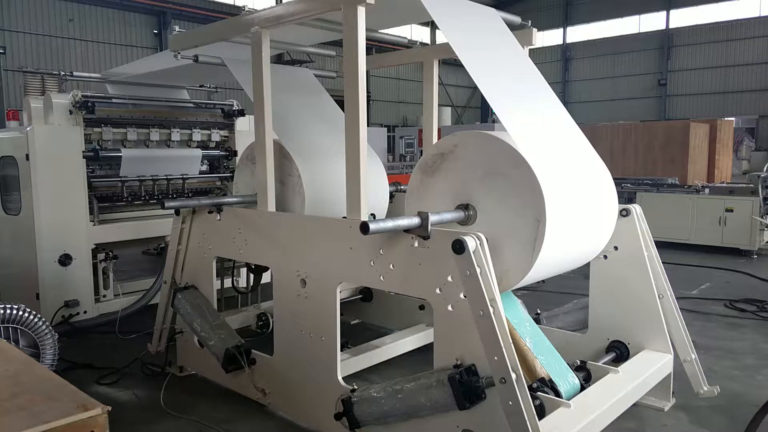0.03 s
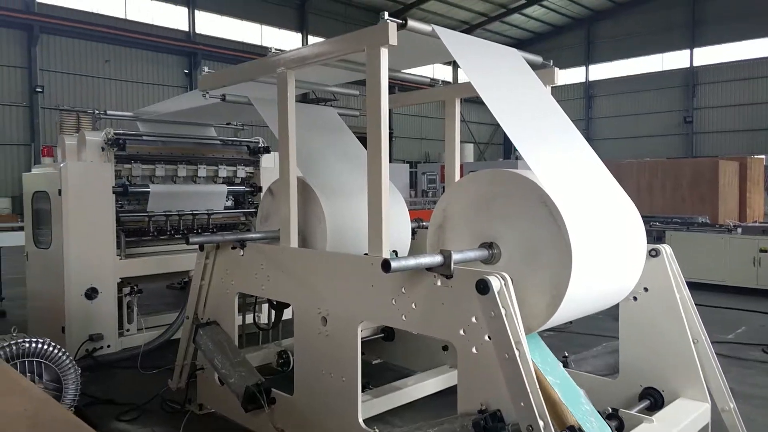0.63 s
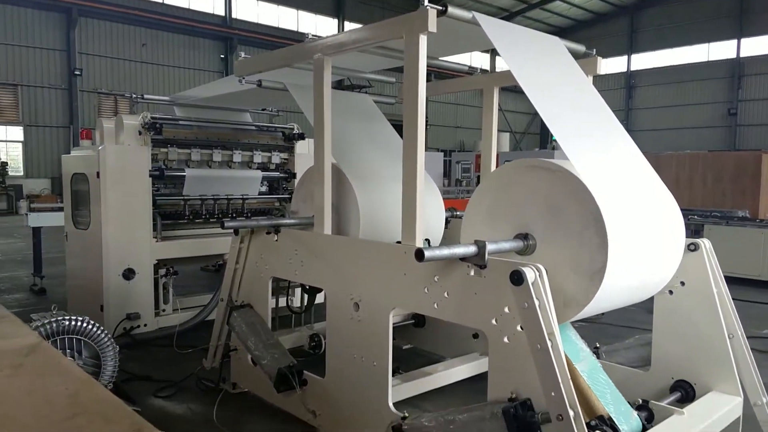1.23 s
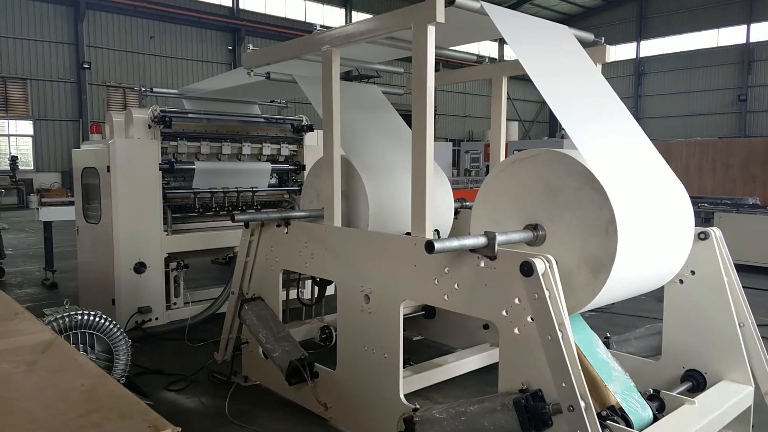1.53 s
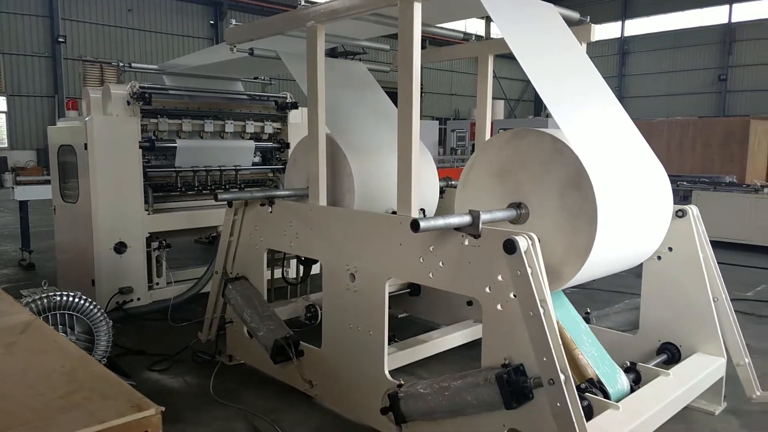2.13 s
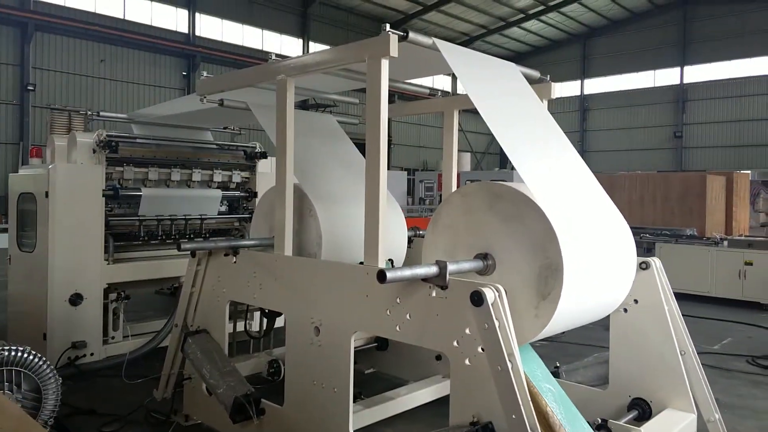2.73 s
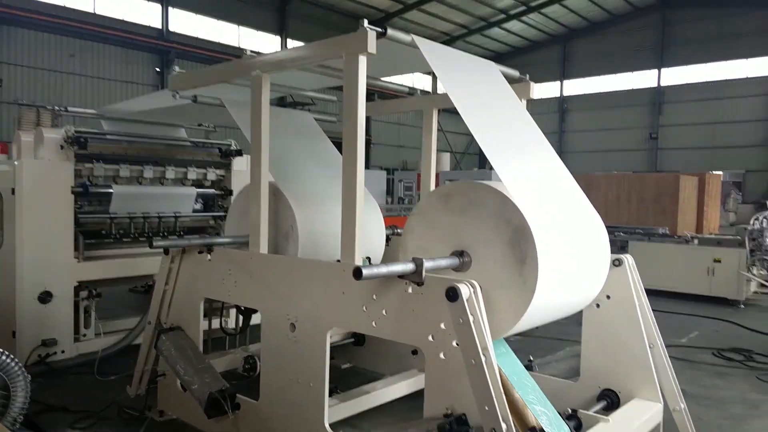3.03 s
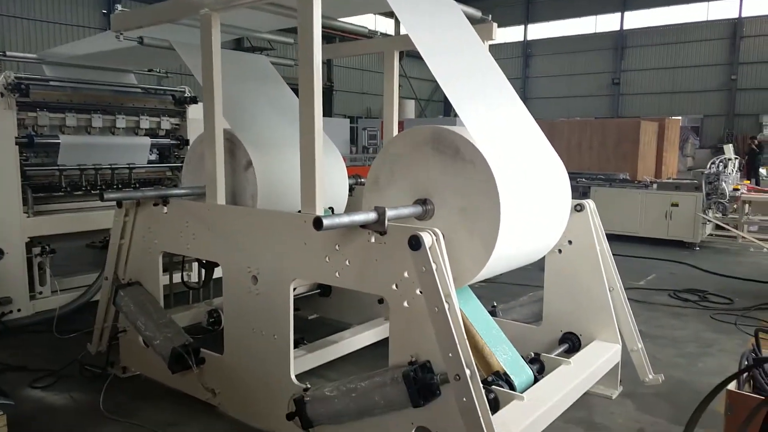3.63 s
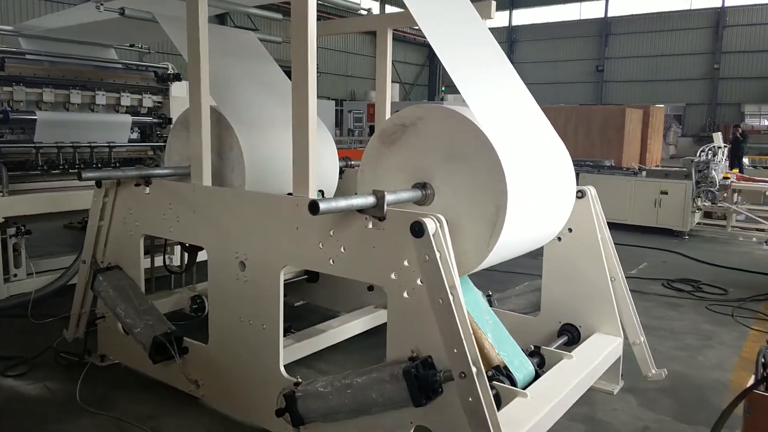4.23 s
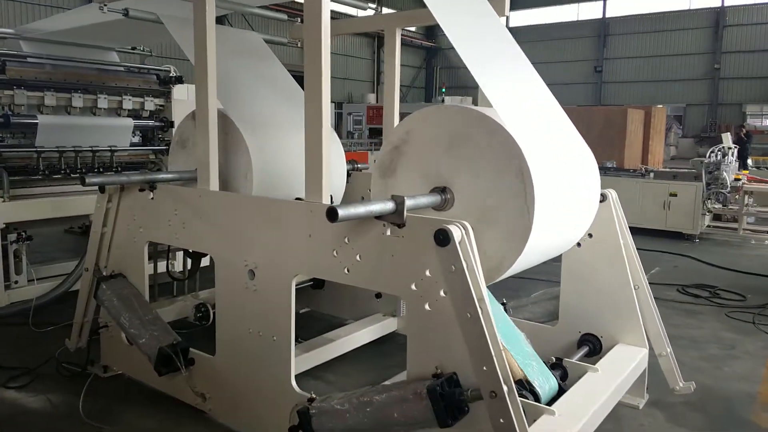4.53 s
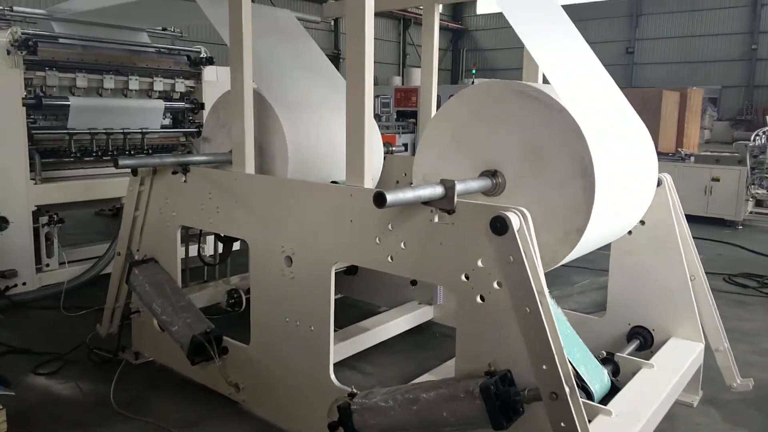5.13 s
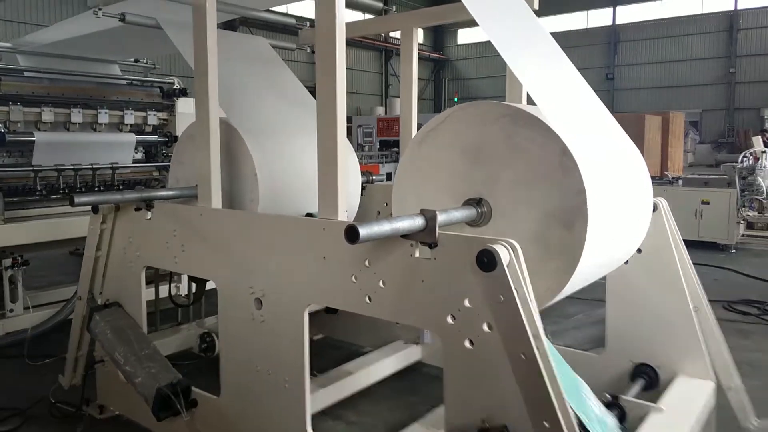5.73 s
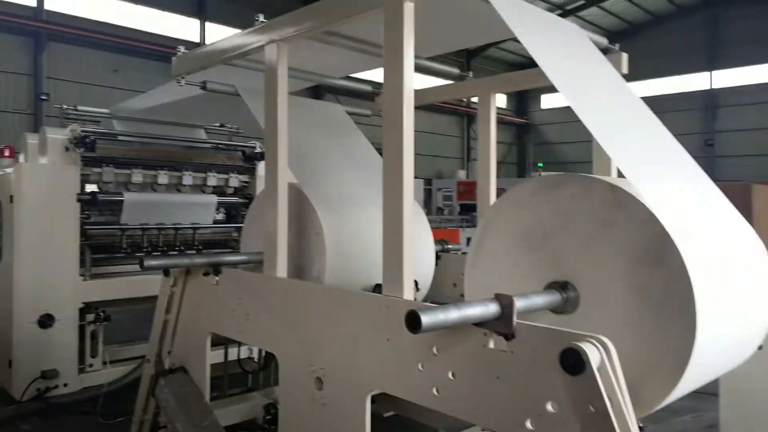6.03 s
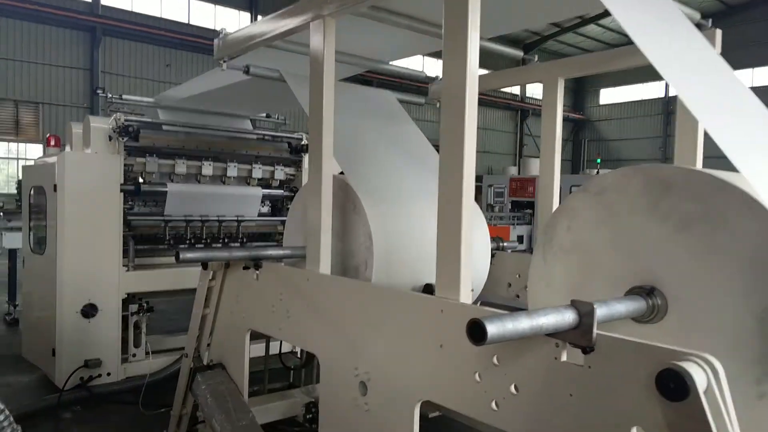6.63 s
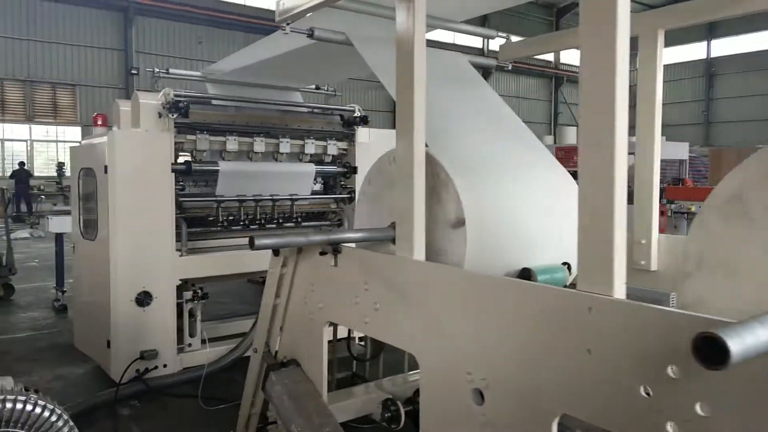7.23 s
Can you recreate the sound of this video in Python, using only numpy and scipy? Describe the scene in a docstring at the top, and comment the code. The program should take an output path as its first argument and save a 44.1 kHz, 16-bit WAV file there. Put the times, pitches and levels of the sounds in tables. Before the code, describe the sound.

A paper converting machine runs loudly in a factory hall, with low thrumming, rushing paper, hissing air and a high wavering whistle.

```python
"""Tissue machine in a factory hall

A hand-held microphone walks past the unwinding reels of a tissue converting machine. Folding rolls
thrum in the steel frame, the paper web rushes, suction air hisses and whistles with each stroke, and
a blower, a gearbox and a motor drive whine. The sound fades in after a short silence; a few light
knocks come later, and twice a finger briefly shades the left microphone port."""
import sys
import numpy as np
from scipy import signal
from scipy.io import wavfile
from scipy.ndimage import uniform_filter1d

SR = 44100
rng = np.random.default_rng(int(sys.argv[2]) if len(sys.argv) > 2 else 0)


def bounce(signal):
    """Save signal as a 16-bit WAV file at the path given by the first command-line argument."""
    frames = np.transpose(np.atleast_2d(signal))
    limited = np.clip(frames, -1, 1)
    pcm = np.round(limited * 32767).astype(np.int16)
    wavfile.write(sys.argv[1], SR, pcm)


N = 325458
T = np.arange(N) / SR


def gain_of(db):
    """Decibels to amplitude."""
    return 10 ** (np.asarray(db) / 20)


def unit_rms(x):
    """Scales to rms 1."""
    return x / np.sqrt(np.mean(abs(x) ** 2) + 1e-20)


def curve(rows, t=T):
    """The columns of a time table, joined by straight lines."""
    times, *columns = np.transpose(rows)
    return np.array([np.interp(t, times, column) for column in columns])


def spectrum_at(points, hz):
    """Reads a spectrum table on a log-frequency axis."""
    freqs, values = np.transpose(points)
    return np.interp(np.log(hz + 1), np.log(freqs + 1), values)


def phase_of(hz):
    """Running phase of a frequency or frequency curve."""
    return 2 * np.pi * np.cumsum(hz * np.ones(N)) / SR


def swell(centre_s, width_s):
    """A smooth rise to 1 and fall around one moment."""
    return np.exp(-((T - centre_s) / width_s) ** 2)


def drift(width_hz):
    """Slow complex random wander, one row per port."""
    step = 32
    hz = np.fft.fftfreq(N // step + 2, step / SR)
    real, imag = rng.standard_normal((2, 2, len(hz)))
    slow = np.fft.ifft((real + 1j * imag) * np.exp(-2 * (hz / width_hz) ** 2))
    return unit_rms(np.array([np.interp(np.arange(N) / step, np.arange(len(hz)), row) for row in slow]))


# The walk up to the steel side frame: time_s, nearness (0-1)
FRAME_NEARNESS = [(3.4, 0), (4.0, 0.27), (4.6, 0.8), (6.5, 0.8)]

def walk_gain(db, left_db, near_db=0, reel_db=0, facing_db=0, near_left_db=0):
    """Level and leftward lean as the walk nears the frame, passes a reel and faces the folding unit."""
    near = curve(FRAME_NEARNESS)[0]
    passing_reel = swell(centre_s=5.43, width_s=0.46)
    facing = np.clip((T - 6.12) / 0.67 + .5, 0, 1)
    level_db = db + near_db * near + reel_db * passing_reel + facing_db * facing
    lean_db = left_db + near_left_db * near
    return gain_of(level_db + np.array([[.5], [-.5]]) * lean_db)


# Ring of the frame, guards and rolls: centre_hz, width_hz, far_lift_db, near_lift_db
BODY_RESONANCES = [(82.6, 16, 9, -2.5), (108, 10, -4, 9.5), (153, 11, 0.5, 3), (173.7, 19, 4, -3),
                   (240.6, 33, 4, 1.5), (290.5, 21.5, 5.5, -1), (312, 21, -3, 5), (356, 25, 2.5, 5),
                   (443.7, 31, 9, 0), (506, 15, 2.5, -8), (568, 17, 3.5, -2.5), (788, 54, 0.5, 4.5),
                   (1050, 34, 7, 3), (1220, 35, 4, 5), (2283, 54, 3, 5.5), (2800, 76, 2, 7),
                   (2874, 54, 5.5, 5.5), (3100, 28, 4.5, -4), (4530, 115, 7, 2)]
# Likeness of the two ports, centred bass to wide treble: freq_hz, coherence (0-1)
PORT_COHERENCE = [(60, 1), (200, 0.93), (330, 0.92), (640, 0.54), (1400, 0.036), (3100, 0.027),
                  (7000, 0.0085)]

def machine_noise(colour, patchy_db, size, modes_db=0, tilt=None):
    """Patchy stereo noise at rms 1, coloured by its source, the machine's body and the hall's modes."""
    hop = size // 4
    t, hz = np.arange(N // hop + 3) * hop / SR, np.fft.rfftfreq(size, 1 / SR)
    left_re, left_im, apart_re, apart_im, patches, modes = rng.standard_normal((6, len(t), len(hz)))
    patches = unit_rms(uniform_filter1d(uniform_filter1d(patches, 3, axis=0), 16, axis=1))
    # standing waves: narrow peaks and dips that last about a second
    modes = unit_rms(uniform_filter1d(uniform_filter1d(modes, SR // hop, axis=0), 2, axis=1))
    db = spectrum_at(colour, hz) + patchy_db * patches + modes_db * modes
    if tilt is not None:
        octaves = np.log2((hz + 1) / 125)
        db += curve(tilt, t).T * octaves * np.exp(-octaves ** 2 / 2)
    centre_hz, width_hz, far_db, near_db = np.transpose(BODY_RESONANCES)
    lift_db = far_db + curve(FRAME_NEARNESS, t).T * (near_db - far_db)
    db += lift_db @ np.exp(-2 * ((hz - centre_hz[:, None]) / width_hz[:, None]) ** 2)
    coherence = np.clip(spectrum_at(PORT_COHERENCE, hz), -1, 1)
    left = left_re + 1j * left_im
    right = coherence * left + np.sqrt(1 - coherence ** 2) * (apart_re + 1j * apart_im)
    spectra = (np.array([left, right]) * gain_of(db)).transpose(0, 2, 1)
    return unit_rms(signal.istft(spectra, nperseg=size, noverlap=size - hop)[1][:, :N])


def standing_waves(diffuse, flicker_hz, turn_rad, lead_rad):
    """Gain and phase of a tone at each port: a slowly turning direct wave plus flickering hall echoes."""
    direct_phase = turn_rad * drift(width_hz=1.95).real + lead_rad * np.array([[1], [0]])
    return unit_rms(np.exp(1j * direct_phase) + diffuse * drift(flicker_hz))


# Deep thrum of the frame: freq_hz, relative_db
THRUM_EQ = [(15, -43), (40, -53), (60, -24), (85, -8.5), (115, -2), (170, 2), (205, -17.5), (320, -48)]
# The thrum deepens in front of the folding unit; slope at 125 Hz: time_s, tilt_db_per_octave
THRUM_SLOPE = [(2.2, 1), (3.3, -1.5), (5.0, 5), (6.1, 2.5), (7.1, -10.5)]
# The rolls labour now and then: centre_s, extra_thrum_db
THRUM_SURGES = [(2.2, 2), (4.68, 3), (6.02, 5), (7.1, 3.5)]
# Low-mid rumble of the rolls: freq_hz, relative_db
RUMBLE_EQ = [(60, -50), (145, -19), (195, -9), (240, -2), (340, 0), (420, -6), (600, -7.5), (800, -13),
             (1150, -18), (1500, -30), (3000, -44)]

def folding_rolls(stroke):
    """The folding rolls shake the frame, a little harder once a stroke; one panel hums."""
    surge_db = sum(db * swell(s, width_s=0.089) for s, db in THRUM_SURGES)
    thrum = machine_noise(THRUM_EQ, patchy_db=0.9, size=4096, modes_db=2.2, tilt=THRUM_SLOPE)
    thrum *= walk_gain(db=-31.5, left_db=2.5, near_db=4)
    thrum *= gain_of(surge_db + 0.67 * np.cos(stroke + 0.69))
    rumble = machine_noise(RUMBLE_EQ, patchy_db=1.24, size=4096, modes_db=2)
    rumble *= walk_gain(db=-22.5, left_db=2, near_db=1.5, facing_db=-1.3, near_left_db=-1)
    rumble *= gain_of(.3 * np.cos(stroke + 0.87))
    hum = unit_rms((drift(width_hz=29)[0] * np.exp(1j * phase_of(hz=874))).real)
    return thrum + rumble + hum * walk_gain(db=-45.5, left_db=7.5, near_db=2, reel_db=7)


# Papery rush of the web: freq_hz, relative_db
WEB_EQ = [(800, -13), (1400, -5), (2000, -3.5), (2400, 0.5), (3300, 0.5), (4000, -2), (4700, -3.5),
          (5400, -20), (8000, -37)]
# Bright suction hiss: freq_hz, relative_db
AIR_EQ = [(3500, -25), (4900, -2), (6200, -1.5), (7800, -1), (9000, 3.5), (12000, -32)]
# Fine sizzle on top: freq_hz, relative_db
SIZZLE_EQ = [(6000, -28), (8000, -12.5), (8800, -2.5), (9600, 1), (10700, -3.5), (12000, -8), (14000, -12),
             (15500, -19.5)]
# Brief swells of all three: centre_s, extra_db
RUSH_SWELLS = [(5.1, 1), (6.0, 2), (7.26, 3)]

def paper_and_air():
    """The web slides over its rollers; air escapes from the suction holes; both waver a little."""
    web = machine_noise(WEB_EQ, patchy_db=1.6, size=1024)
    web *= walk_gain(db=-30.5, left_db=.3, near_db=-0.5, reel_db=2.5, facing_db=0.4, near_left_db=-0.6)
    air = machine_noise(AIR_EQ, patchy_db=1.64, size=512)
    air *= walk_gain(db=-34, left_db=1.2, near_db=1.1, reel_db=0.8, facing_db=-1.5, near_left_db=4.5)
    sizzle = machine_noise(SIZZLE_EQ, patchy_db=1.5, size=512)
    sizzle *= walk_gain(db=-34.5, left_db=8, near_db=1.5, reel_db=-1.5, facing_db=0.7, near_left_db=-3)
    rush_db = sum(db * swell(s, width_s=0.078) for s, db in RUSH_SWELLS)
    return (web + air + sizzle) * gain_of(rush_db + .45 * drift(width_hz=14).real[0])


# Fader ride as the microphone crosses the whistle's standing waves: time_s, left_db, right_db
WHISTLE_RIDE = [(1.0, -33, -30.5), (1.7, -33.5, -31.5), (2.3, -36.5, -31.0), (3.2, -34, -28.5),
                (4.4, -28.5, -34), (5.05, -21.5, -32), (5.4, -30, -31.0), (5.8, -28, -29.5),
                (6.02, -24, -28.5), (6.19, -29.5, -24.5), (6.33, -20, -31.5), (6.55, -22.5, -20.5),
                (6.85, -20.0, -30), (7.1, -25, -21.5), (7.38, -29, -30)]
# How far the whistle at the left port leads the right: time_s, lead_rad
WHISTLE_PHASE_LEAD = [(3.0, 0.26), (4.0, 1.85), (5.8, 2.66), (6.3, 0.59), (7.0, .6)]
# Rough bands just above the note: offset_hz, width_hz, relative_db
FLUTTER_BANDS = [(74.6, 40, -6.5), (107.6, 49, -12.5), (187.7, 110, -19)]

def suction_whistle(stroke, pitch_hz):
    """Suction air whistles; its pitch rocks with each stroke and with the uneven pull of the reels."""
    rock_hz = 7 * np.cos(stroke) + 1.8 * np.cos(2 * stroke + .4) + 4.3 * np.cos(stroke / 2 - 2.1)
    pull_hz = -2.5 * np.sin(phase_of(hz=1.07)) - 1.5 * np.cos(phase_of(hz=2.9))
    carrier = np.exp(1j * phase_of(pitch_hz + rock_hz + pull_hz))
    # once a stroke the clean note weakens and breaks into flutter
    breakup = np.cos(stroke + 0.99)
    core = standing_waves(diffuse=0.41, flicker_hz=24, turn_rad=0.46, lead_rad=curve(WHISTLE_PHASE_LEAD))
    core *= gain_of(-1.4 * breakup)
    flutter = sum(gain_of(db) * drift(width_hz) * np.exp(1j * phase_of(offset_hz))
                  for offset_hz, width_hz, db in FLUTTER_BANDS)
    # the shaking hand makes the level waver
    ride_db = curve(WHISTLE_RIDE) + drift(width_hz=9.4).real
    # flutter fills the hall evenly, so the note is purer where it swells
    purity_db = 0.15 * (ride_db + 32)
    tone = unit_rms(core + flutter * gain_of(2.8 * breakup - purity_db)) * carrier
    # the octave has other standing waves, so it follows the swells only in part
    octave = gain_of(-37.5 + 0.16 * ride_db) * unit_rms(((core + 1.1 * flutter) * carrier ** 2).real)
    return gain_of(ride_db + 1.46) * unit_rms(tone.real) + octave


# Fader ride through the blade tone's standing waves: time_s, left_db, right_db
BLOWER_RIDE = [(1.0, -34, -34), (1.6, -31, -38), (2.5, -35.5, -46), (3.7, -28.5, -36), (3.95, -41.5, -53),
               (4.2, -29, -39), (4.75, -32, -50), (5.5, -28, -30), (6.0, -41, -41.0), (6.6, -45, -38.5),
               (7.1, -33.5, -36.5), (7.38, -31.5, -47)]
# Its faintest overtones: harmonic_number, level_db
BLOWER_OVERTONES = [(2, -56), (3, -49.5), (5, -61)]

def blower():
    """The blades sing one nearly steady pitch with thin overtones, the fourth harmonic leaning left."""
    blade_phase = phase_of(hz=2576.7 + 1.36 * drift(width_hz=2.88).real[0])

    def partial(harmonic, diffuse):
        wave = standing_waves(diffuse, flicker_hz=23, turn_rad=0.49, lead_rad=0.55)
        return unit_rms((wave * np.exp(1j * harmonic * blade_phase)).real)

    whine = gain_of(curve(BLOWER_RIDE) + 0.6) * partial(1, diffuse=0.32)
    whine += walk_gain(db=-45.5, left_db=13, near_db=-2, near_left_db=-6) * partial(4, diffuse=0.59)
    return whine + sum(gain_of(db) * partial(harmonic, diffuse=0.54) for harmonic, db in BLOWER_OVERTONES)


def gearbox():
    """Meshing teeth sing behind the side frame."""
    wave = standing_waves(diffuse=0.3, flicker_hz=14, turn_rad=0.48, lead_rad=0.75)
    mesh = unit_rms((wave * np.exp(1j * phase_of(hz=1388))).real)
    return mesh * walk_gain(db=-47.5, left_db=-5.5, near_db=6.5, facing_db=-9.5, near_left_db=1.5)


# Thin electrical whine: pitch_hz, level_db
SWITCHING_TONES = [(7917, -59), (8020, -59), (8051, -55)]

def motor_drive():
    """The drive's switching gives faint, wavering high tones."""
    return sum(gain_of(db) * unit_rms((drift(width_hz=5) * np.exp(1j * phase_of(hz))).real)
               for hz, db in SWITCHING_TONES)


# A finger lands on the left port, lifts and hovers: start_s, hold_s, hover_s, cover (0-1)
FINGER_TOUCHES = [(0.544, 0.14, 0.73, .4), (4.37, 0.1, 0.52, 0.52)]
# Muffling of a fully covered port: freq_hz, gain_db
COVER_EQ = [(300, 0.5), (900, -14), (2500, -22), (6000, -26), (12000, -14)]
# Treble shadow of the nearby finger: freq_hz, gain_db
HOVER_EQ = [(2000, -0.5), (4000, -2), (6500, -3), (9000, -11.5), (14000, -7.5)]

def finger_shade_db(hz, t):
    """A resting finger muffles the left port; a hovering one takes only its treble."""
    land_s, lift_s, leave_s = 0.093, 0.079, 0.47
    cover, hover = 0, 0
    for start_s, hold_s, hover_s, depth in FINGER_TOUCHES:
        landed = np.clip((t - start_s) / land_s, 0, 1)
        since_lift = t - start_s - land_s - hold_s
        cover += depth * landed * np.clip(1 - since_lift / lift_s, 0, 1)
        hover += landed * np.clip(.5 - (since_lift - hover_s) / leave_s, 0, 1)
    cover_db = spectrum_at(COVER_EQ, hz)[:, None] * cover
    hover_db = spectrum_at(HOVER_EQ, hz)[:, None] * hover
    reflected_db = -0.13 * hover_db  # the hand bounces a little treble into the right port
    return np.array([cover_db + hover_db, reflected_db])


# A bump on the microphone and light ticks in the mechanism: start_s, level_db, pitch_hz, decay_s
KNOCK_HITS = [(4.375, -8.5, 306, .014), (6.362, -26, 1680, .004), (6.989, -24, 1600, .004)]

def knocks():
    """Each knock rings a small part for a few cycles."""
    out = np.zeros(N)
    for start_s, level_db, pitch_hz, decay_s in KNOCK_HITS:
        age = np.maximum(T - start_s, 0)
        envelope = np.minimum(age * pitch_hz, 1) * np.exp(-age / decay_s)
        out += gain_of(level_db) * envelope * np.sin(2 * np.pi * pitch_hz * age)
    return out


# Pace and tuning of the running machine: time_s, strokes_per_s, whistle_pitch_hz
MACHINE_RUN = [(.6, 5.63, 4273), (1.3, 5.38, 4277), (2.0, 5.7, 4279), (2.7, 5.94, 4285), (3.4, 5.88, 4282),
               (4.1, 5.97, 4280), (4.8, 6.05, 4277), (5.4, 6.79, 4279), (6.0, 6.23, 4291),
               (6.7, 6.54, 4289), (7.38, 5.98, 4283)]

def scene():
    """The whole machine; the folding stroke paces the rolls and the whistle."""
    strokes_per_s, whistle_pitch_hz = curve(MACHINE_RUN)
    stroke = phase_of(strokes_per_s) - 1.13
    return (folding_rolls(stroke) + paper_and_air() + suction_whistle(stroke, whistle_pitch_hz)
            + blower() + gearbox() + motor_drive() + knocks())


def record(dry):
    """The finger dulls the left port; then come the fade-in, a small boost and a steep top cut."""
    start_s, boost_db, cutoff_hz = .629, 2, 15600
    hz, t, spectra = signal.stft(dry, SR, nperseg=512)
    shaded = signal.istft(spectra * gain_of(finger_shade_db(hz, t)), SR)[1][:, :N]
    fade = np.clip(0.12 + (T - start_s) / 0.34, 0, 1) * (T > start_s)
    lowpass = signal.firwin(511, cutoff_hz, window=("kaiser", 9), fs=SR)
    return signal.oaconvolve(shaded * fade * gain_of(boost_db), lowpass[None], "same")


dry = scene()
out = record(dry)
bounce(out)
```